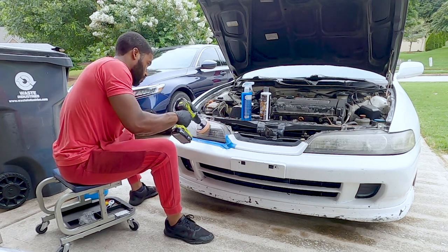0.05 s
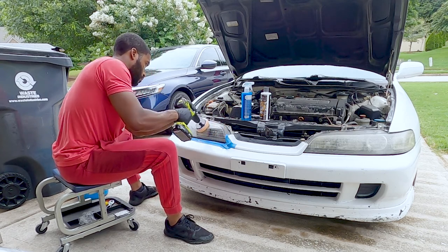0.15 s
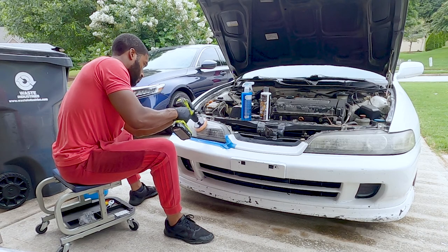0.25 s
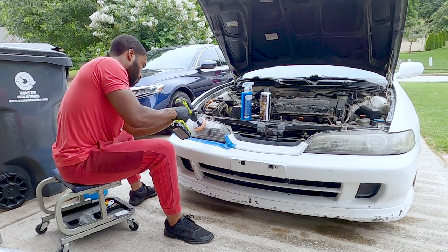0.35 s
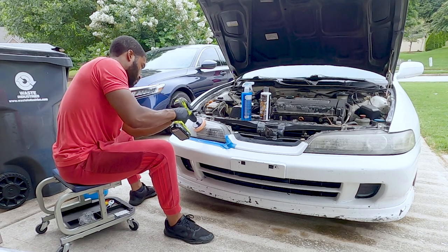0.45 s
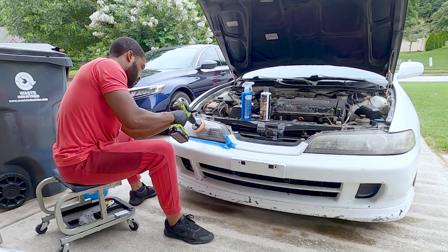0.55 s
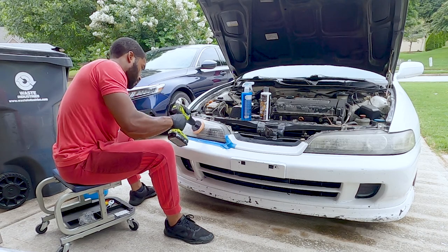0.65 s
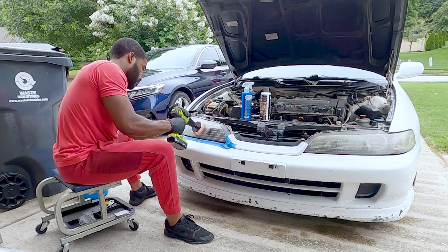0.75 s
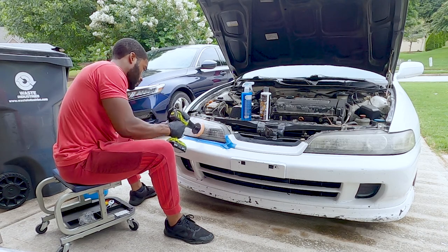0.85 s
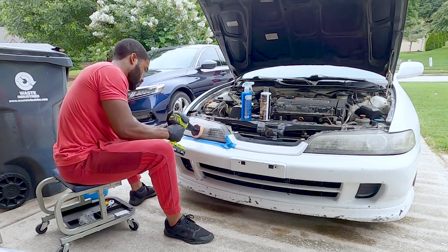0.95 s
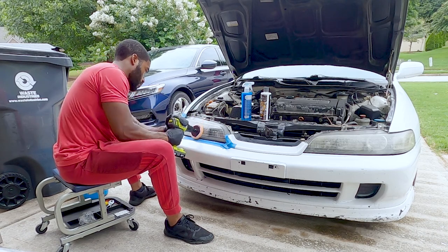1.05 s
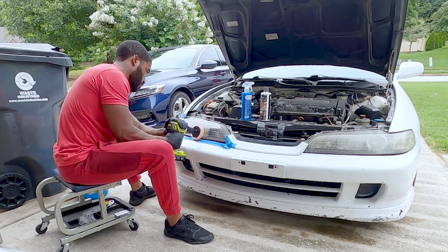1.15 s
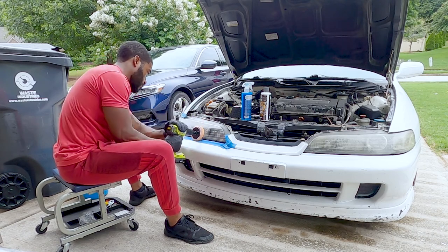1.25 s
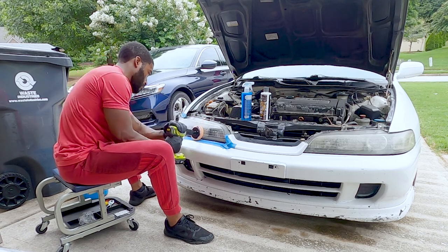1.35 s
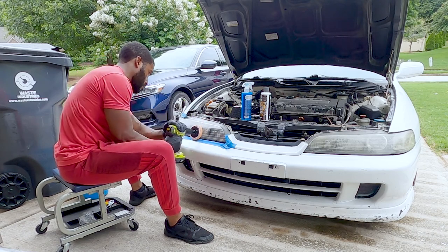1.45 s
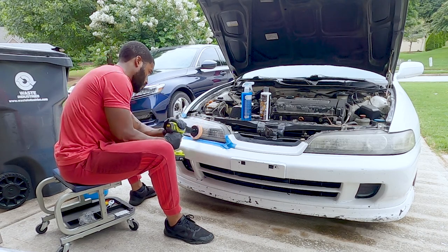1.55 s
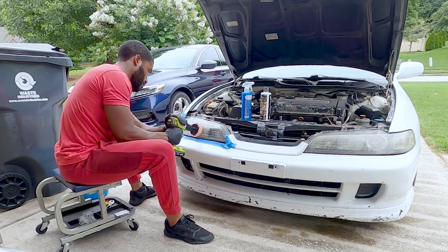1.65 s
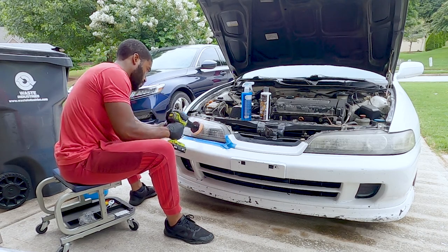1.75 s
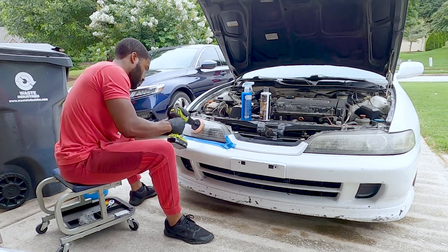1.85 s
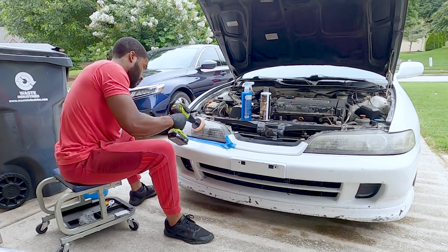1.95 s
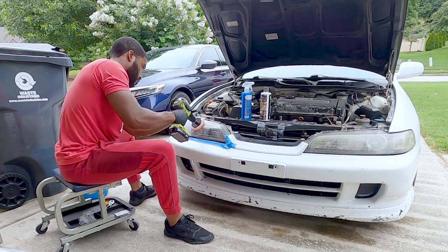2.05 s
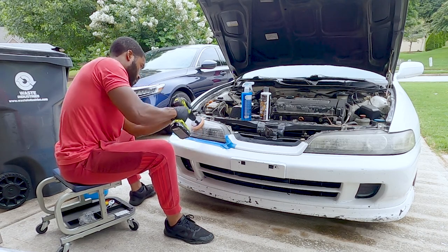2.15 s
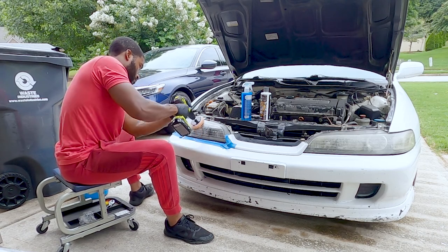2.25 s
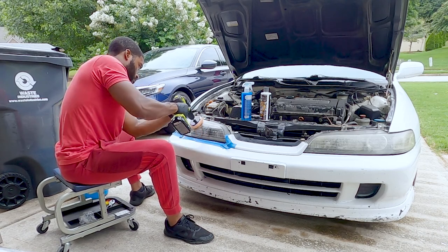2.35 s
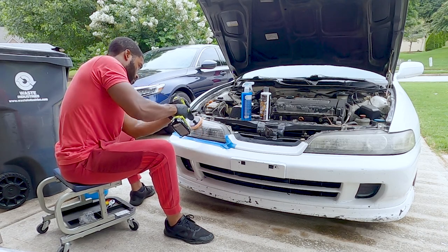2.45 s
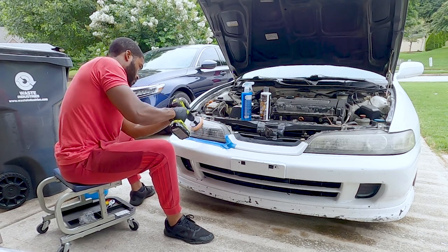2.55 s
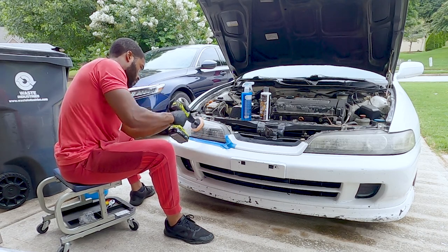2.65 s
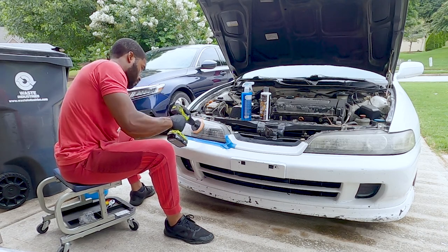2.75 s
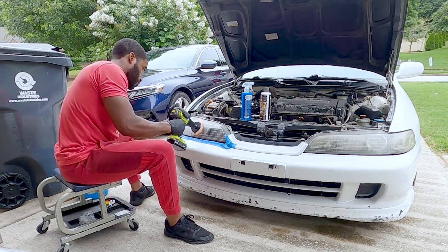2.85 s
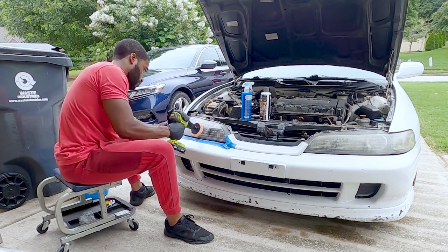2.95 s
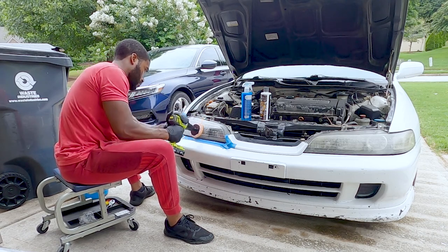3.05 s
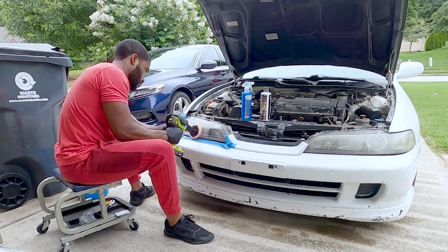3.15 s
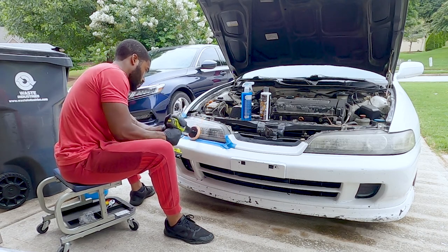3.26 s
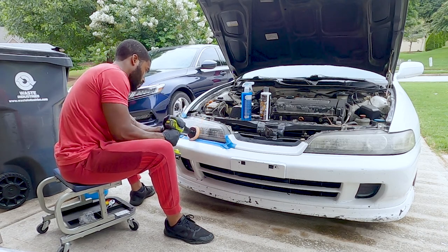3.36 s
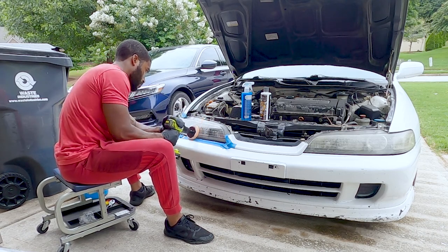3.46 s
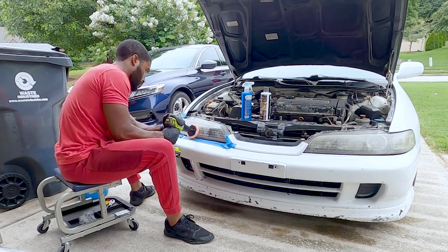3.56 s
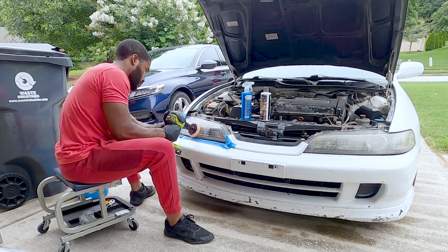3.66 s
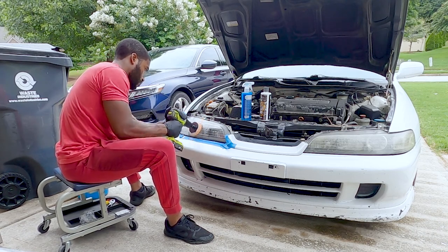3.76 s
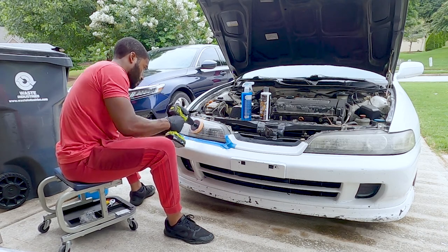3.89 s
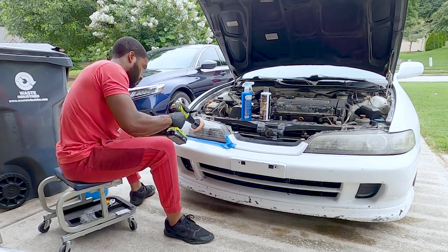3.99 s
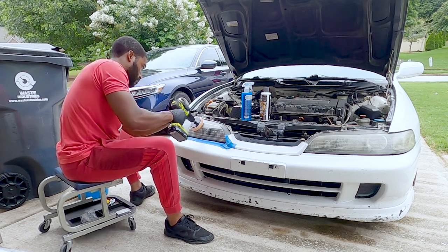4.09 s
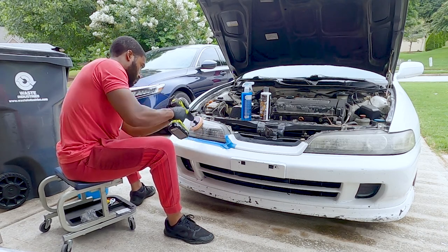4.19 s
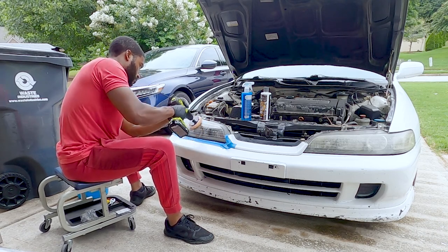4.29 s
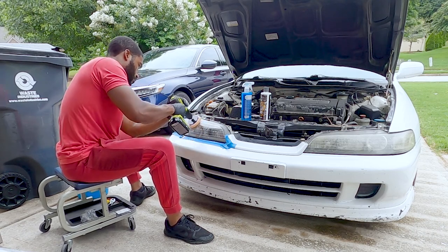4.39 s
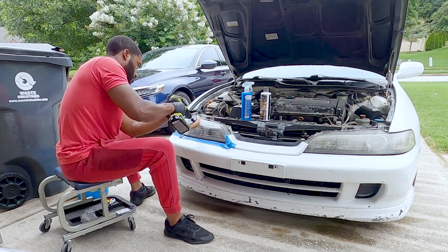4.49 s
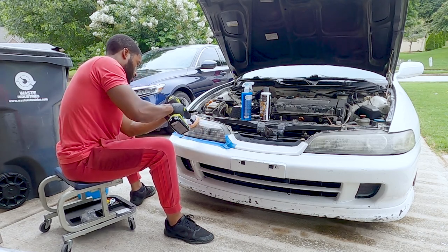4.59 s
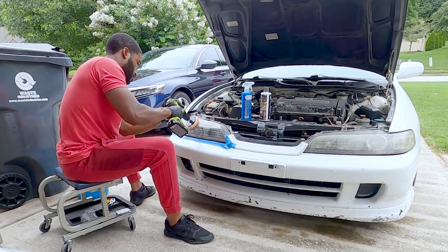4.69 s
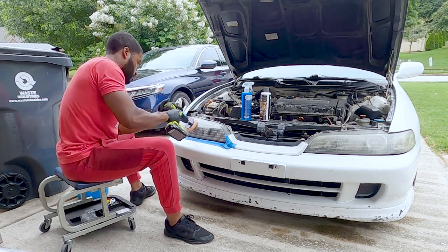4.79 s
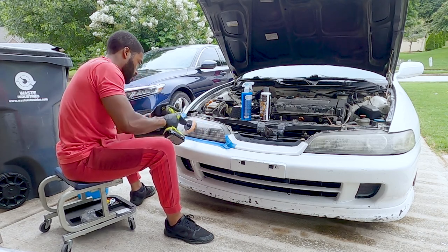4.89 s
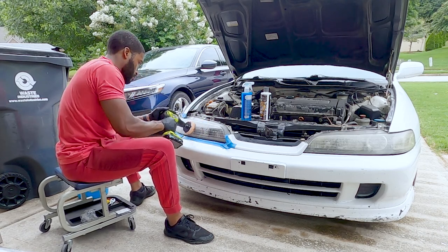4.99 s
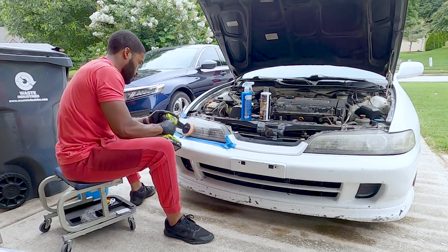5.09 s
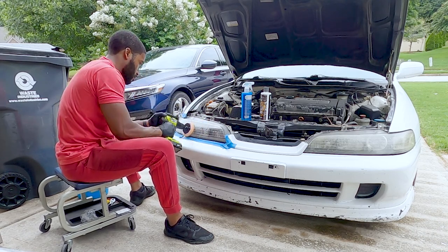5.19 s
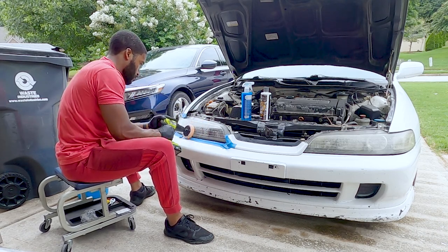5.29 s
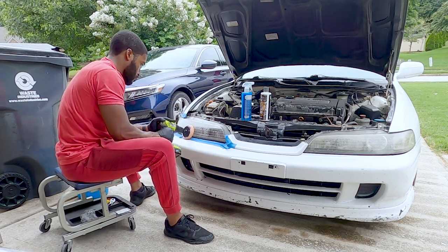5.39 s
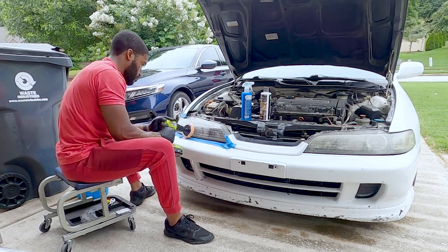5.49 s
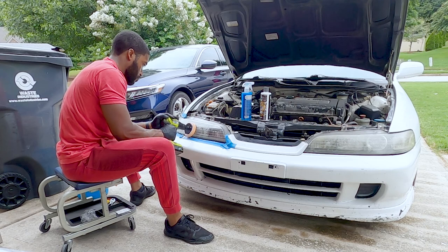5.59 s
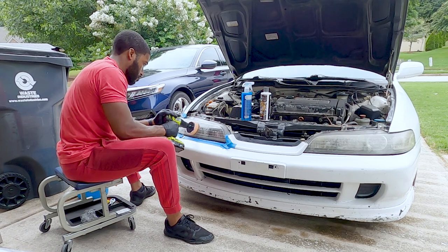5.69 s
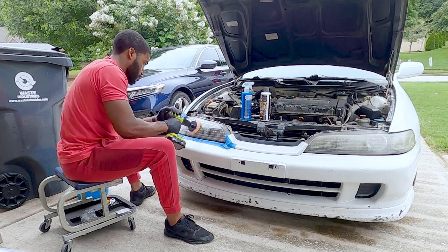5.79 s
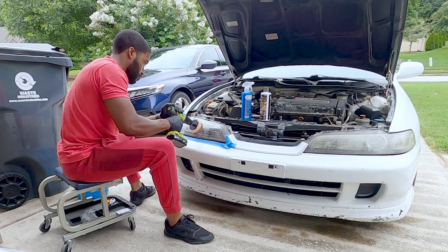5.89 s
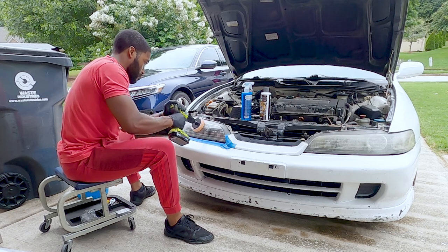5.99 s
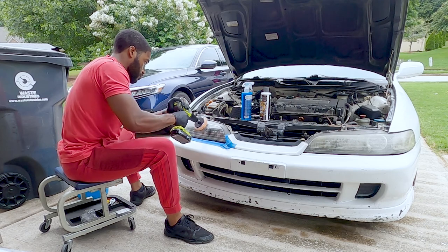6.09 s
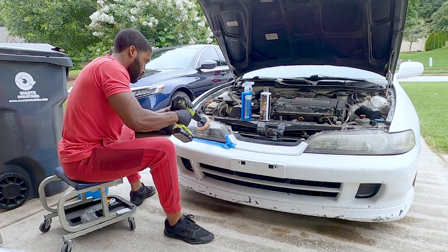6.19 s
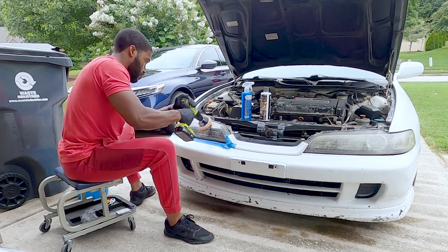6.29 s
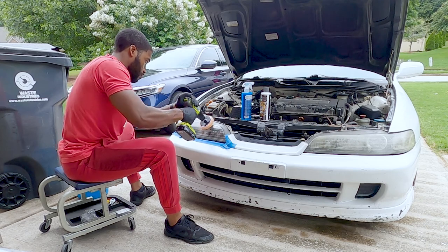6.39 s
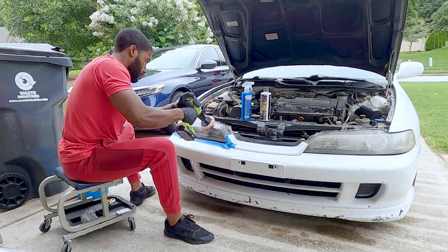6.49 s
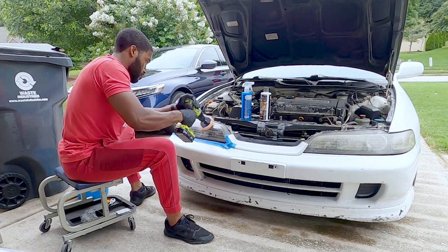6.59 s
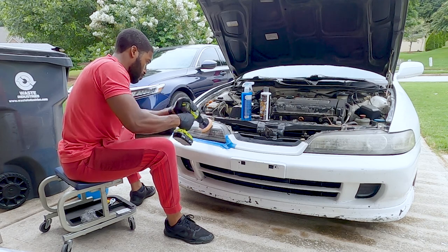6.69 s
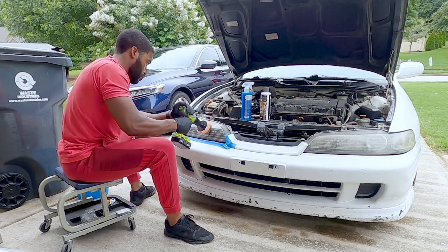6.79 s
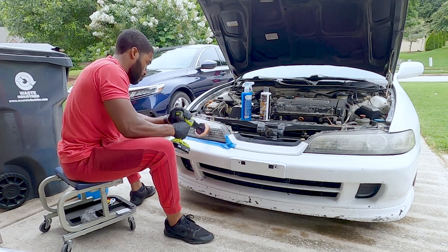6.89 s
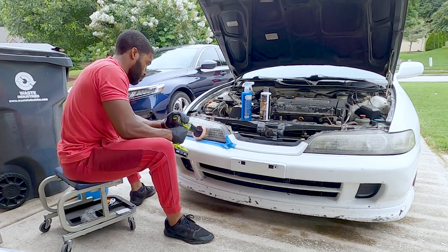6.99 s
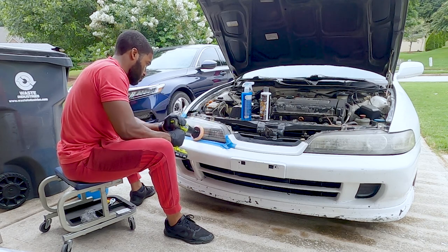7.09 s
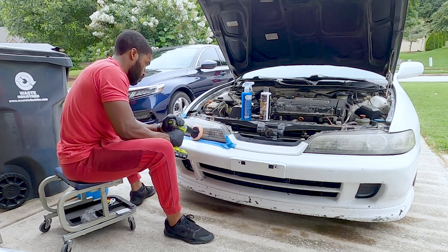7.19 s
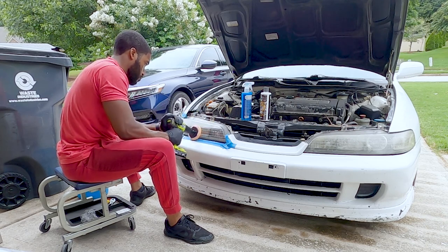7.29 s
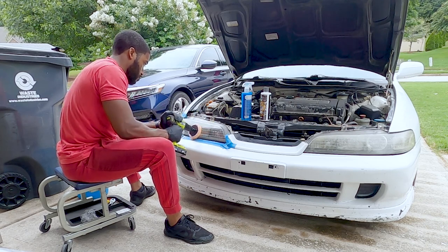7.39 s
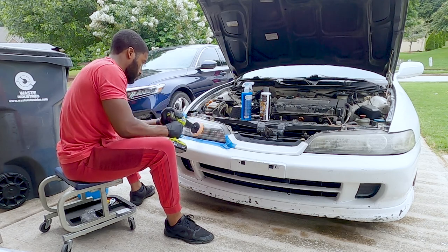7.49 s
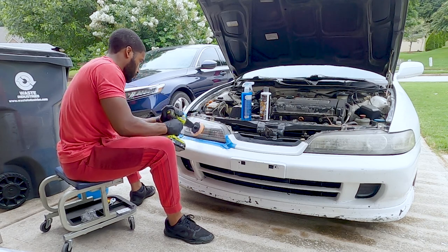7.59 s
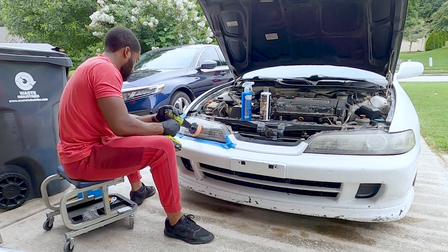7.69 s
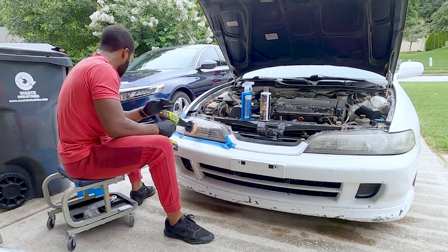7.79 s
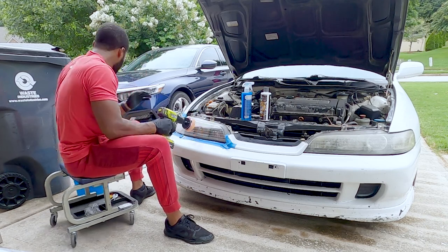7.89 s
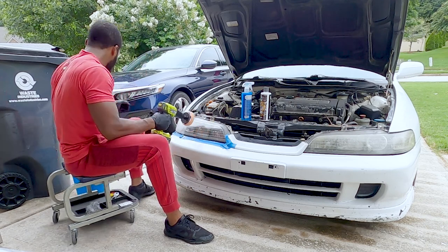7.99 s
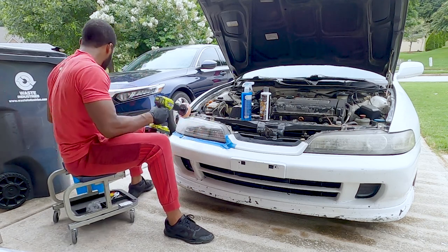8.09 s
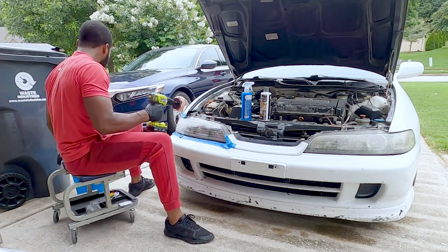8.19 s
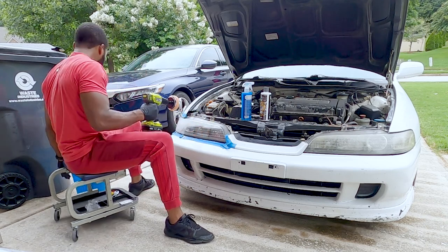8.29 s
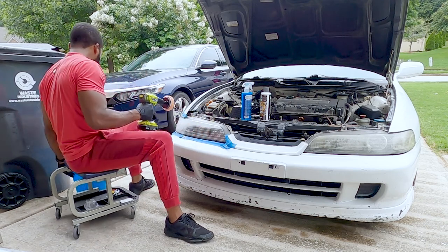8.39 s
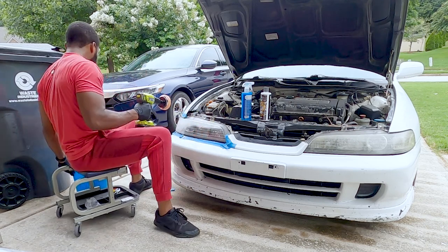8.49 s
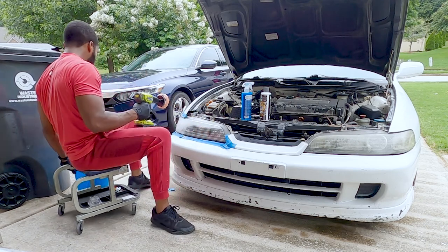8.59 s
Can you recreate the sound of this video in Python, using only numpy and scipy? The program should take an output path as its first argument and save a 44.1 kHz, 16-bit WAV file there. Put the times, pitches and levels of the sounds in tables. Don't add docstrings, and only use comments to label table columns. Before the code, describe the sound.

Outdoors in a driveway, about two metres from a stereo microphone, a cordless drill already runs at full speed, polishing a plastic lens: steady gear whine, rattling midrange and airy hiss, slightly wavering with pressure. Near the end it brakes to sudden silence, and a wheeled stool scrapes and knocks over concrete with a metallic jingle. A far engine drones over faint traffic.

```python
import sys
import numpy as np
from scipy import signal
from scipy.fft import rfft, irfft, next_fast_len
from scipy.io import wavfile
from scipy.ndimage import uniform_filter1d, map_coordinates

SR = 44100
rng = np.random.default_rng(int(sys.argv[2]) if len(sys.argv) > 2 else 0)


def wrap_up_sound(samples):
    columns = np.atleast_2d(samples).T
    tamed = np.clip(columns, -1, 1)
    steps = np.round(tamed * 32767).astype(np.int16)
    wavfile.write(sys.argv[1], SR, steps)


def nominal_scale(level):
    x = np.asarray(level, float) / 20
    return 10 ** x


N = 381465
TIME = np.arange(N) / SR
STOP = 7.722


def unit(x):
    return x / np.sqrt(np.mean(x ** 2) + 1e-20)


def along(points, hz):
    f, v = np.transpose(points)
    return np.interp(np.log(hz + 1), np.log(f + 1), v)


def curves(rows):
    s, *cols = np.transpose(rows)
    return [np.interp(TIME, s, c) for c in cols]


def wobble(rate):
    return map_coordinates(rng.standard_normal(int(N * rate / SR) + 4), [TIME * rate])


def filtered(x, response):
    m = next_fast_len(N + 8192)
    return irfft(rfft(x, m) * response(np.fft.rfftfreq(m, 1 / SR)), m)[..., :N]


def body(modes):
    def response(f):
        total = 0
        for k, (centre, width, db) in enumerate(modes):
            damping = 1j * f * width
            total = total + (-1) ** k * nominal_scale(db) * damping / (centre * centre - f * f + damping)
        return total
    return response


def shape(spectrum):
    return lambda hz: nominal_scale(along(spectrum, hz))


def blurred(size, bins, hops):
    field = uniform_filter1d(rng.standard_normal(size), bins, axis=0)
    return unit(uniform_filter1d(field, hops, axis=1))


def rush(patchy_db, grain_db):
    z = signal.stft(rng.standard_normal((2, N)), nperseg=512)[2]
    patches_db = patchy_db * blurred(z.shape[1:], bins=5, hops=16)
    ripples_db = 1.3 * blurred(z.shape[1:], bins=1, hops=70)
    pair = signal.istft(z * nominal_scale(patches_db + ripples_db), nperseg=512)[1][:, :N]
    return pair * nominal_scale(grain_db * wobble(700))


def hiss():
    return nominal_scale(-54.5) * rng.standard_normal((2, N))


# t/s, level/dB
ENGINE_SWELL = [(0, -39.5), (1.05, -39), (1.35, -47), (2.6, -40.5), (2.85, -47), (5.35, -46.5),
                (5.9, -40.5), (6.5, -40.5), (7.2, -40), (7.6, -45), (8.4, -38), (8.65, -54)]


def far_engine():
    swell_db, = curves(ENGINE_SWELL)
    level_db = swell_db - .7 + 1.5 * wobble(5)
    turning = 2 * np.pi * np.cumsum(65 + 1.547 * wobble(3.1)) / SR
    firing = np.sin(turning) * nominal_scale(1.8 * wobble(7))
    boom = filtered(rng.standard_normal(N), body([(65.6, 13.6, 0)]))
    drone = nominal_scale(level_db) * unit(unit(firing) + 0.57 * unit(boom))
    return drone * [[1], [0]]


# f/Hz, level/dB per Hz
RUMBLE = [(12, -35), (20, 1), (48, 4.5), (76, 3.5), (121, 2), (287, -13.5), (321, -14.5), (347, -7),
          (394, -19.5), (420, -9), (550, -36), (920, -120)]


def traffic():
    recedes_db = 0.68 * TIME
    returns_db = 3 * np.clip(TIME - 7.3, 0, 1)
    level_db = -40 - recedes_db + returns_db + 1.5 * wobble(3.07)
    return nominal_scale(level_db) * unit(filtered(rush(1.3, 0.69), shape(RUMBLE)))


# f/Hz, t60/s
YARD_T60 = [(300, 0.21), (3000, 0.18), (10000, 0.033)]


def yard(x):
    hz, t, z = signal.stft(rng.standard_normal((2, SR // 2)), SR, nperseg=256)
    decay = nominal_scale(-60 * t / along(YARD_T60, hz)[:, None])
    tail = signal.istft(z * decay, SR, nperseg=256)[1]
    return signal.fftconvolve(x, tail / np.linalg.norm(tail[0]), axes=1)[:, :N]


# t/s, peak level/dB, pitch f/Hz, jingle level/dB, thud level/dB (last two relative to peak)
BUMPS = [(7.821, -27.5, 2360, -7, -23), (7.849, -29, 1810, -12, -27), (7.914, -28, 2700, -6, -26),
         (7.971, -27.5, 915, -18, -27), (8.016, -17, 1560, -13, -23), (8.052, -24, 2720, -22, -13),
         (8.118, -31, 1890, -19, -25), (8.191, -21, 1500, -10, -36), (8.202, -39, 912, -7, -20),
         (8.252, -31, 1180, 0.5, -27), (8.274, -16.5, 1030, -31, -17.5), (8.308, -24.5, 2170, -8, -19),
         (8.319, -23, 1810, -12, -32), (8.336, -25.5, 1220, -11, -22), (8.372, -26, 1920, -10, -29),
         (8.393, -21, 3750, -24, -31), (8.433, -27, 1500, -15, -24), (8.493, -28, 1480, -15, -21),
         (8.53, -26.5, 4200, -6, -23), (8.538, -25, 3100, -14, -28), (8.586, -26, 1720, -19, -17),
         (8.629, -14, 2800, -18, -35)]


def caster_bumps():
    bump_t60, tick_t60, thud_t60 = 0.056, 0.011, 0.026
    bumps, shaken = np.zeros((2, N + SR)), np.zeros(N + SR)
    t = np.arange(SR // 10) / SR
    fall = nominal_scale(-60 * t / bump_t60) * (1 - np.exp(-t / 0.001))
    tick = nominal_scale(3 - 60 * t / tick_t60)
    thump = np.sin(2 * np.pi * np.outer([220, 410], t)).sum(axis=0) * nominal_scale(-60 * t / thud_t60)
    for s, db, hz, jingle_db, thud_db in BUMPS:
        band = signal.butter(2, [hz / 1.21, hz * 1.21], "bandpass", fs=SR)
        scrape = unit(signal.lfilter(*band, rng.standard_normal((2, len(t)))))
        thud = nominal_scale(thud_db + 10.5) * thump * [[1], [0]]
        start = round(s * SR)
        bumps[:, start:start + len(t)] += nominal_scale(db - 4.5) * (fall * scrape + thud)
        shaken[start:start + len(t)] += nominal_scale(db + jingle_db - 3.5) * (fall + tick)
    return bumps[:, :N], shaken[:N]


# t/s, grind level/dB
ROLLING = [(7.76, -40), (7.955, -39), (7.99, -33), (8.12, -31.5), (8.17, -39), (8.245, -43), (8.44, -35),
           (8.57, -40.5), (8.59, -29)]
# f/Hz, level/dB per Hz
GRIT = [(210, -51), (350, -30), (418, -11), (738, -16), (921, -6), (1180, -9), (1550, -5), (1680, -6.5),
        (1860, -5), (5000, -14.5), (6500, -57), (11000, -120)]
# f/Hz, level/dB per Hz
FRAME = [(3500, -10), (4500, -6), (6000, -4), (7900, -8.5), (9100, 1), (10500, -12.5), (13500, -24),
         (15800, -21)]


def stool():
    grind_db, = curves(ROLLING)
    jingle_db = -43.5 + .9 * (grind_db + 37)
    rolling = np.clip((TIME - 7.76) / 0.042, 0, 1)
    grind = nominal_scale(grind_db) * unit(filtered(rush(0.88, 2), shape(GRIT)))
    metal = unit(filtered(rush(3.7, 1.4), shape(FRAME)))
    bumps, shaken = caster_bumps()
    return rolling * grind + (rolling * nominal_scale(jingle_db) + shaken) * metal + bumps


# f/Hz, level/dB per Hz
VENT_AIR = [(4500, -31), (6200, -2), (7500, 0.5), (8400, 3), (9000, 6), (10000, 0), (11100, -11),
            (12000, -6.5), (12800, -12.5), (14200, -15), (14700, -5.5), (15100, -19), (15800, -21)]


def vents(turns, near_db, place_db, braked):
    level_db = near_db - 9.45 + 0.21 * place_db - 410 * braked + 0.63 * wobble(8.7)
    throb = 1 + 0.11 * np.sin(2 * np.pi * turns)
    return nominal_scale(level_db) * unit(filtered(rush(1.0, 0.63) * throb, shape(VENT_AIR)))


# f/Hz, width/Hz, level/dB
HOUSING_MODES = [(513, 450, -28.5), (740, 290, -16.5), (1744, 296, -5.5), (2110, 810, -7), (2947, 610, -2),
                 (3610, 540, 0), (4360, 676, -0.5), (4916, 423, -0.5), (5780, 630, -10)]


def gears(turns, near_db, braked):
    throb = 1 + 0.029 * np.sin(2 * np.pi * 0.14 * turns)
    rattle = unit(filtered(rush(0.53, 0.5) * throb, body(HOUSING_MODES)))
    return nominal_scale(near_db - 0.04 - 320 * braked) * rattle


# f/Hz, width/Hz, level/dB
LOW_MODES = [(1001.5, 56, -2.5), (1218, 80, 2)]
HIGH_MODES = [(1432, 137, 6), (1683, 58, -9.5)]
RIM_MODES = [(1090, 104, 0)]


def lens(near_db, place_db, braked):
    contact_db = near_db - 500 * braked
    low_db = contact_db - 15.2 - 0.69 * place_db + 1.1 * wobble(7)
    high_db = contact_db - 14.44 + 1.1 * place_db + 0.73 * wobble(7)
    rim_db = contact_db - 24 - 1.84 * place_db
    low = nominal_scale(low_db) * unit(filtered(rush(0.72, 0.53), body(LOW_MODES)))
    high = nominal_scale(high_db) * unit(filtered(rush(0.56, 0.8), body(HIGH_MODES)))
    rim = nominal_scale(rim_db) * unit(filtered(rush(.9, .6), body(RIM_MODES)))
    return low + high + rim


# t/s, speed/turns per s
SPEED = [(0, 350), (.5, 348.9), (.78, 346.6), (1.35, 345.8), (1.72, 348.8), (2, 347.6), (2.75, 347.6),
         (3.3, 346.1), (3.55, 344.3), (4.12, 349.2), (4.9, 345.7), (5.4, 345.6), (5.65, 347.1), (6, 348),
         (6.35, 347.3), (6.75, 348.6), (7.37, 345.9), (7.65, 347.3)]


def shaft(braked):
    judder = .6 * wobble(15)
    speed = (curves(SPEED)[0] + judder) * np.exp(-braked / 0.083)
    return np.cumsum(speed) / SR


def swing(rows):
    return sum(db * np.exp(-((TIME - s) / half) ** 4) for s, half, db in rows)


STRONG_ORDERS = (1, 10, 10.21, 12, 13, 14, 25)
STRONG_DB = [-50.5, -52, -33.7, -43.5, -45.5, -47.5, -47.5]
# middle t/s, half length/s, gain/dB
BEAMING = [
    [],
    [(.3, .42, 15), (1.55, .36, 16), (3.27, .17, 11), (4.02, .32, 13), (4.88, .36, 19)],
    [(.42, .45, -6), (2.52, .24, -14), (4.53, .19, -21), (5.5, .3, 2.5), (6.5, .6, -5)],
    [(.25, .5, 8), (2.72, .16, 9), (4.25, .14, 10), (4.63, .17, 12), (5.42, .2, 5), (7.35, .35, 6)],
    [(.1, .35, 6.5), (1.45, .25, 7), (6.08, .42, 9), (6.9, .22, 7)],
    [(.2, .5, 6), (1.72, .24, 8), (2.55, .35, 8), (5.2, 1.0, 9.5), (7.5, .25, 9)],
    [(.45, .2, 5), (1.5, .48, 6), (2.5, .45, 6), (3.45, .45, 6.5), (4.35, .24, 7), (7.15, .6, 8)],
]
# multiple of the shaft speed, rms level/dB
WEAK_ORDERS = [(2, -60), (3, -53), (3.5, -49), (4, -48), (5, -46), (7, -52), (9, -47), (9.5, -42),
               (11, -47), (15, -50), (19, -58), (20, -58), (24, -50), (26, -55), (28, -58), (29, -59),
               (30, -61), (31, -67), (34, -68), (35, -67)]
BRUSH_BLUR = {13: .8, 14: .8}


def whine(turns, place_db, braked):
    levels = [db + swing(rows) for db, rows in zip(STRONG_DB, BEAMING)]
    levels[0] = levels[0] + 0.66 * np.minimum(place_db, 0)
    lines = list(zip(STRONG_ORDERS, levels, [1, 2, 1, 1.2, 2.5, 2.5, 2.5]))
    lines += [(k, db - .5, 2.8) for k, db in WEAK_ORDERS]
    total = np.zeros((2, N))
    for k, db, flutter_db in lines:
        slip = .014 * k * wobble(25) + BRUSH_BLUR.get(k, 0) * wobble(45)
        phase = 2 * np.pi * k * turns + slip + rng.uniform(0, 2 * np.pi)
        brake_db = (300 + 90 * k) * braked
        size = nominal_scale(db + 2.5 + .17 * min(k, 22) + flutter_db * wobble(6) - brake_db)
        total += size * np.sin([phase, phase + 3 * wobble(4)])
    return total


# t/s, nearness as gear level/dB, pad place/dB
GRIP = [(0.04, -22.5, -1), (.87, -22.5, 0), (1.2, -22.5, 3), (1.6, -23, 5), (2.06, -22, -1.2),
        (2.45, -23.5, 0), (2.74, -22.5, -2), (3.2, -22.5, 3), (4.0, -22.5, 1.5), (4.45, -22.5, -1),
        (4.6, -24, -0.5), (4.84, -21.5, 1), (5.35, -21.5, 3), (5.9, -22, -3.5), (6.6, -22.5, -6),
        (6.85, -22, -3.5), (7.4, -23, -4.5), (7.71, -22.5, -4.5)]


def drill():
    braked = np.maximum(TIME - STOP, 0)
    turns = shaft(braked)
    near_db, place_db = curves(GRIP)
    tones = whine(turns, place_db, braked)
    gone_db = -900 * np.maximum(braked - .07, 0)
    shake_db = 0.26 * wobble(5) + 0.12 * wobble(22) + gone_db
    noise = lens(near_db, place_db, braked) + gears(turns, near_db, braked)
    noise = noise + vents(turns, near_db, place_db, braked)
    return tones + nominal_scale(shake_db) * noise


# f/Hz, likeness (0 to 1)
LIKENESS = [(60, 1), (130, 0.97), (290, 0.94), (640, 0.92), (1410, 0.86), (3100, 0.74), (6820, 0.86),
            (15000, 0.067)]
# f/Hz, left over right level/dB
LEFT_OVER_RIGHT = [(60, 1), (110, -1.5), (200, 3), (380, 0.5), (700, 0.0), (1290, 0), (2380, 2.5),
                   (4400, 0.5), (8120, 1), (15000, -3.5)]
# f/Hz, left lead/radians
LEFT_LEADS = [(0, 0.48), (2580, -0.36), (4220, -0.49), (5680, -0.86), (6890, -1.3), (7580, -1.5),
              (8610, -0.38), (9220, -0.39), (10100, -1.4), (13400, -1.4), (14100, 0.1), (14800, -0.51),
              (15200, -0.0), (15600, -0.1)]


def ports(pair):
    def turn(hz):
        return np.arccos(np.clip(along(LIKENESS, hz), -1, 1)) / 2

    def half(hz):
        return nominal_scale(along(LEFT_OVER_RIGHT, hz) / 2) * np.exp(.5j * along(LEFT_LEADS, hz))

    mid, side = filtered(pair, lambda hz: [np.cos(turn(hz)), np.sin(turn(hz))])
    return filtered(np.array([mid + side, mid - side]), lambda hz: [half(hz), 1 / half(hz)])


def scene():
    wheels, tool = stool(), drill()
    background = hiss()
    echo = yard(nominal_scale(-10) * wheels + nominal_scale(-14) * tool)
    background = background + far_engine() + traffic()
    return ports(background + echo + wheels + tool)


def roll_off(x):
    return signal.sosfilt(signal.butter(12, 16030, fs=SR, output="sos"), x)


# f/Hz, level/dB
BAND_LIMIT = [(15050, 0), (15400, -2), (15740, -4), (15820, -90)]


def record(dry):
    finished = filtered(dry, shape(BAND_LIMIT))
    return roll_off(finished)


dry = scene()
out = record(dry)
wrap_up_sound(out)
```